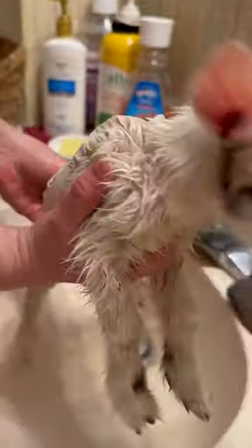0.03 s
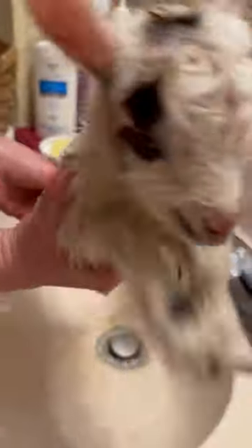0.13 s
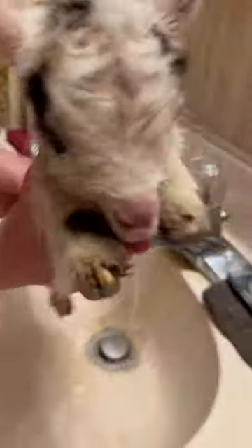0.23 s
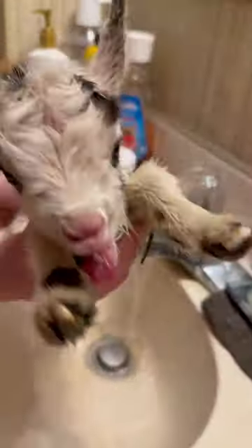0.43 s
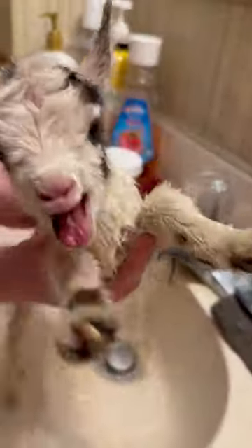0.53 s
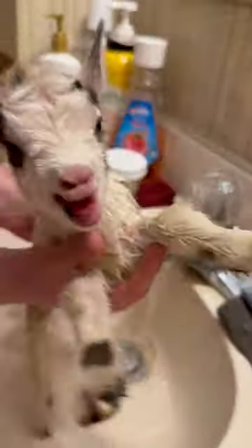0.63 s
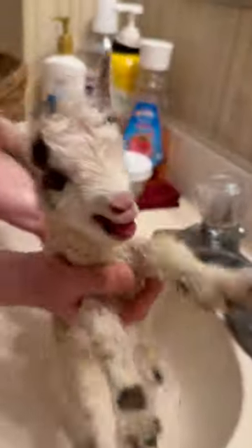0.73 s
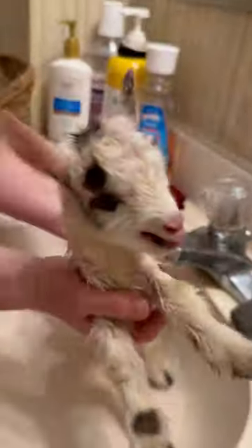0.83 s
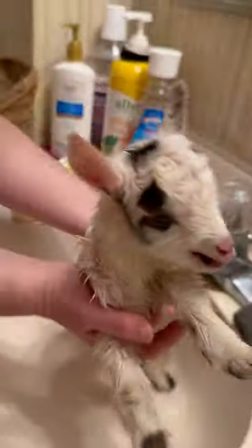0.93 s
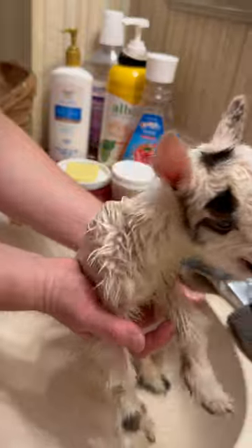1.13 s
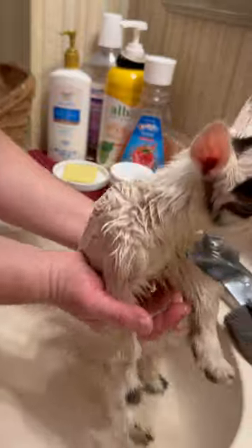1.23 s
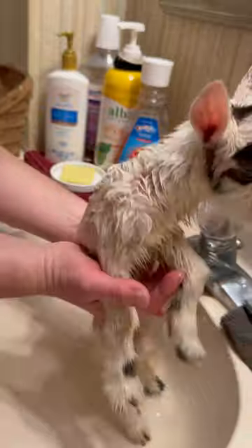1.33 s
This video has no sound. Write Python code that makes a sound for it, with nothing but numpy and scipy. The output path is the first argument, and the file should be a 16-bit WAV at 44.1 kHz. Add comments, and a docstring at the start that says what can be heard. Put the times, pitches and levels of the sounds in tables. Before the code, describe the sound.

A baby goat gives one loud, high bleat close to the microphone from about 0.1 to 0.55 seconds, starting as a thin squeak, opening into a clear shrill note and dropping into a rasp. A tap runs quietly into a bathroom sink throughout. Soft splashes come between 0.7 and 1.1 seconds, a brief low hum around 1.2, and light knocks on the basin near 1.3.

```python
"""A tap runs into a bathroom sink throughout, over a faint room rumble.
Almost at once a baby goat, held over the basin, gives one loud high bleat close to the microphone:
a thin closed-mouth squeak, a clear shrill note as the mouth opens, a rasp as the pitch drops.
Its vocal folds buzz through the throat; basin, wall and mirror reflect the cry.
A few soft splashes, a brief low hum and light knocks on the basin follow."""
import sys
import numpy as np
from scipy import signal
from scipy.fft import rfft, irfft
from scipy.io import wavfile
from scipy.ndimage import map_coordinates

SR = 44100
rng = np.random.default_rng(int(sys.argv[2]) if len(sys.argv) > 2 else 0)


def transcribe(u):
    """Save the signal u as a 16-bit wav file named by the first command-line argument.

    u: samples, shape (n,) or (channels, n), limited to [-1, 1]; the rate is SR.
    q: integer samples, one column per channel.
    """
    v = np.clip(np.atleast_2d(u).T, -1, 1)
    q = np.round(v * 32767).astype(np.int16)
    wavfile.write(sys.argv[1], SR, q)


N = 61739

# droplet spectrum: freq_hz, gain_db
WATER_SPECTRUM = [(150, -42), (250, -12.5), (480, -4.5), (700, -11.5), (1100, -12.5), (1630, -11.5),
                  (2050, -11), (2500, -4.5), (3200, -10), (4000, -5), (4500, -8.5), (6200, -7), (9500, -11),
                  (12400, -43)]
# basin resonances: freq_hz, width_hz, gain_db
BASIN_MODES = [(1628, 163, -6), (2502, 173, -4), (4022, 94, 2.5), (5120, 80, -4), (6130, 37, 0.5),
               (7180, 140, -11.5), (7760, 360, -13.5)]
# tap flow: time_s, gain_db
FLOW = [(0, 3), (.15, 2.5), (.6, 0.5), (.9, 0.5), (1.15, -1), (1.35, 1)]
# stereo width of the water: freq_hz, side_minus_mid_db
WATER_SIDE = [(60, -11), (110, -14), (200, -7), (380, -7), (700, 1.5), (1290, -15.5), (2380, 2), (4400, -7),
              (8120, 2.5), (15000, 23)]
# room rumble: freq_hz, gain_db
RUMBLE_SPECTRUM = [(20, -36), (40, -15), (54, 0.5), (80, -6.5), (140, -5), (220, -13.5), (500, -25),
                   (2000, -72)]
# bleat melody: time_s, pitch_hz
PITCH = [(.106, 1160), (.12, 869), (.145, 806), (.168, 963), (.2, 1030), (.236, 1087), (.275, 1080),
         (.335, 1047), (.37, 1047), (.42, 1024), (.445, 1030), (.5, 1012), (.517, 978.4), (.53, 870),
         (.54, 733.4), (.55, 642.4)]
# vocal effort: time_s, gain_db
EFFORT = [(0.1, -34), (0.12, -9.5), (0.15, -2), (0.175, -2), (0.195, -3), (0.218, 3.5), (0.245, -0.3),
          (0.27, 1.2), (0.295, 3), (0.32, 2), (0.375, 2.5), (0.45, -0.5), (0.512, -2.1), (0.524, -10.5),
          (0.533, -6), (0.547, -13), (0.56, -47)]
# hoarseness: time_s, roughness_0_to_1
ROUGHNESS = [(.11, 0.3), (.16, 0.31), (.18, 0.08), (.23, 0.05), (.3, 0.03), (.48, 0.04), (.512, 0.04),
             (.524, 0.51), (.55, 0.53)]
# air rush in the voice: freq_hz, gain_db
AIR_SPECTRUM = [(500, -26), (1400, -17), (2200, -9), (2750, 9.5), (3600, -16), (4500, 1), (5300, 8.5),
                (8000, -11), (11000, -6)]
# throat and open mouth: freq_hz, gain_db
THROAT_RESPONSE = [(300.0, -43), (800.0, -42.5), (1050.0, -34.5), (1400.0, -29), (1900.0, -21.5),
                   (2150.0, -23), (2700.0, -21), (3100.0, -24.5), (3300.0, -34.5), (3650.0, -36),
                   (4050.0, -35.0), (4250.0, -24), (4600.0, -33), (5000.0, -28.5), (5400.0, -23),
                   (5800.0, -27.5), (6200.0, -20), (6600.0, -30.5), (7300.0, -20), (8300.0, -26.5),
                   (8750.0, -31), (9400.0, -34), (10500.0, -41.5), (11200, -45), (12000, -104),
                   (13200, -48), (15000, -45)]
# basin, wall and mirror reflections: delay_ms, drift_ms_per_s, gain_db
ECHOES_LEFT = [(0.227, 0.28, -8.5), (1.565, 0.72, -18.5), (0.232, -0.71, -16)]
ECHOES_RIGHT = [(0.581, 0.86, -10), (2.463, -0.086, -13.5), (2.106, 0.677, -9.5)]
# splashes: start_s, pitch_hz, level_db, t60_s
SPLASHES = [(.717, 1580, -42.5, 0.044), (.782, 437, -51.5, 0.21), (0.852, 1550, -50.5, .05),
            (1.124, 1650, -42.5, 0.046)]
# hum swells: start_s, length_s, level_db
HUM_SWELLS = [(.99, 0.18, -56.5), (1.125, 0.14, -47.5)]
# knocks on the basin: start_s, level_db
KNOCKS = [(1.302, -47), (1.352, -46), (1.364, -48)]
# struck basin modes: freq_hz, gain_db, t60_s
KNOCK_MODES = [(567, -0.5, 0.073), (785, -4, .08), (1026, -8, 0.14), (1167, -1.5, .08), (1880, 0, 0.043)]

MOUTH_OPENS_S = 0.15
TIME_S = np.arange(N) / SR
SIDE_SIGNS = np.array([[1], [-1]])


def undb(db):
    """Decibels to gain."""
    return 10 ** (np.asarray(db) / 20)


def unit(x):
    """Scale to rms 1."""
    return x / np.sqrt(np.mean(x ** 2))


def curve(rows):
    """Join (time_s, value) points by straight lines."""
    return np.interp(TIME_S, *np.array(rows).T)


def colour(x, points):
    """Filter by a (freq_hz, gain_db) outline."""
    hz, db = np.array(points).T
    bins_hz = np.maximum(np.fft.rfftfreq(2 * N, 1 / SR), 1)
    gain = undb(np.interp(np.log(bins_hz), np.log(hz), db))
    return irfft(rfft(x, 2 * N) * gain)[..., :N]


def resonate(x, hz, width_hz):
    """One resonance, gain 1 at centre."""
    return signal.lfilter(*signal.iirpeak(hz, hz / width_hz, fs=SR), x)


def noise():
    """White noise."""
    return rng.standard_normal(N)


def band(hz, width_hz):
    """Steep noise band, rms 1."""
    return unit(resonate(resonate(noise(), hz, width_hz), hz, width_hz))


def wobble(hz):
    """Smooth random motion up to hz, rms 1."""
    return unit(signal.sosfilt(signal.butter(2, hz, fs=SR, output="sos"), noise()))


def fade(start_s, t60_s, attack_s=0.00096):
    """Quick rise, exponential decay."""
    age_s = np.maximum(TIME_S - start_s, 0)
    return (1 - np.exp(-age_s / attack_s)) * np.exp(-np.log(1000) * age_s / t60_s)


def droplets(rate_per_s=3500, spread_db=3.5):
    """Drop impacts: impulses of random time, sign and size."""
    hits = rng.random(N) < rate_per_s / SR
    return hits * np.sign(noise()) * undb(spread_db * noise())


def stream(patter_db=-53, ring_db=-52.5, drift_ratio=0.00697, waver_db=0.57, top_hz=9970):
    """Dense droplets patter on the basin and ring its wandering resonances."""
    patter = unit(colour(droplets(), [(60, -40)] + list(WATER_SPECTRUM)))
    ring = unit(sum(undb(db + 1.4 * wobble(18.5)) * resonate(droplets(), hz, width_hz)
                    for hz, width_hz, db in BASIN_MODES))
    warped_samples = np.cumsum(1 + drift_ratio * wobble(19.9))
    ring = map_coordinates(ring, [warped_samples], order=3, mode="mirror")
    flow = undb(curve(FLOW) + waver_db * wobble(12))
    water = (undb(patter_db) * patter + undb(ring_db) * ring) * flow
    return signal.sosfilt(signal.cheby1(10, .5, top_hz, fs=SR, output="sos"), water)


def tap():
    """Running water, spread left and right."""
    return stream() + colour(stream(), WATER_SIDE) * SIDE_SIGNS


def rumble(level_db=-65):
    """Low room noise, mostly centred."""
    mid = unit(colour(noise(), RUMBLE_SPECTRUM))
    side = unit(colour(noise(), RUMBLE_SPECTRUM))
    return undb(level_db) * (mid + 0.3 * side * SIDE_SIGNS)


def mouth_gain(harmonic, opening_s=.011, nasal_db=5.5, closed_db_per_octave=-29.5):
    """Until it opens, the mouth muffles overtones and favours the fundamental."""
    closed = np.exp(-np.maximum(TIME_S - MOUTH_OPENS_S, 0) / opening_s)
    return undb(closed * (nasal_db + closed_db_per_octave * np.log2(harmonic)))


def notch_gain(hz, centre_hz=4100, width_hz=160, depth_db=-9, end_s=0.2086):
    """Overtone dip; vanishes as the cry reaches full voice."""
    early = np.clip((end_s - TIME_S) / .004, 0, 1)
    return undb(depth_db * early * np.exp(-((hz - centre_hz) / width_hz) ** 2))


def bleat(harmonics=15, flutter_hz=258, jitter_per_rough=.042, shimmer_per_rough=0.59, air_gain_db=-5.5):
    """Vocal folds flutter with hoarseness; their harmonics and pulsed air pass through the throat."""
    rough, pitch_hz = curve(ROUGHNESS), curve(PITCH)
    flutter = unit(resonate(noise(), flutter_hz, width_hz=320))
    pitch_ratio = 1 + jitter_per_rough * rough * flutter + 0.0013 * wobble(43)
    phase = 2 * np.pi * np.cumsum(pitch_hz * pitch_ratio) / SR
    folds = sum(mouth_gain(k) * notch_gain(k * pitch_hz) * np.sin(k * phase)
                for k in range(1, harmonics + 1))
    air_gain = undb(air_gain_db) * np.sqrt(harmonics) * rough * mouth_gain(harmonics / 2)
    air = air_gain * (1 + np.cos(phase)) * colour(noise(), AIR_SPECTRUM)
    source = folds * (1 + shimmer_per_rough * rough * wobble(350)) + air
    voiced = (TIME_S > EFFORT[0][0]) & (TIME_S < EFFORT[-1][0])
    return colour(source * undb(curve(EFFORT)) * voiced, THROAT_RESPONSE)


def mic_port(x, echoes, lag_s=0, reference_s=0.3526):
    """Direct sound plus reflections at one port; their delays drift as the head moves."""
    def delayed(delay_s):
        return map_coordinates(x, [(TIME_S - delay_s) * SR], order=3)

    reflections = sum(undb(db) * delayed((delay_ms + drift_ms_per_s * (TIME_S - reference_s)) / 1000)
                      for delay_ms, drift_ms_per_s, db in echoes)
    return delayed(lag_s) + reflections


def room(x, t60_s=0.16, gain_db=-11):
    """Short diffuse ring of a small bathroom."""
    tails = rng.standard_normal((2, N)) * fade(0.0046, t60_s)
    tails /= np.sqrt(np.sum(tails ** 2, axis=1, keepdims=True))
    return undb(gain_db) * signal.fftconvolve(x[None], tails, axes=1)[:, :N]


def lips(level_db=-40):
    """Faint wet smack as the lips part."""
    return undb(level_db) * band(hz=1250, width_hz=400) * fade(MOUTH_OPENS_S, t60_s=0.045)


def splashes():
    """Small dollops of water land in the basin."""
    return sum(undb(db) * band(hz, hz / 3) * fade(start_s, t60_s) for start_s, hz, db, t60_s in SPLASHES)


def hum(pitch_hz=138.1):
    """Low hum, two swells, perhaps from the drain."""
    swells = sum(undb(db) * np.sin(np.pi * np.clip((TIME_S - start_s) / length_s, 0, 1))
                 for start_s, length_s, db in HUM_SWELLS)
    wavering_hz = pitch_hz * (1 + 0.023 * wobble(13))
    return swells * np.sin(2 * np.pi * np.cumsum(wavering_hz) / SR)


def knocks(scatter_db=2, thud_db=-7.5):
    """Light bumps on the basin: a dull thud and short modes, struck differently each time."""
    out = 0
    for start_s, level_db in KNOCKS:
        ring = 0
        for hz, mode_db, t60_s in KNOCK_MODES:
            gain = undb(mode_db + scatter_db * rng.standard_normal())
            ring += gain * fade(start_s, t60_s) * np.sin(2 * np.pi * hz * (TIME_S - start_s))
        thud = undb(thud_db) * band(hz=820, width_hz=820) * fade(start_s, t60_s=0.057)
        out += undb(level_db) * (ring + thud)
    return out


def scene():
    """Goat close by, water and small sounds around it; stereo."""
    voice = bleat() + lips()
    goat = np.array([mic_port(voice, ECHOES_LEFT, lag_s=2.9e-5), mic_port(voice, ECHOES_RIGHT)])
    impacts = splashes() + knocks()
    return rumble() + goat + room(voice + impacts) + impacts + tap() + hum()


def record(dry, top_hz=15800):
    """Steep treble cut."""
    return signal.sosfilt(signal.ellip(10, .2, 80, top_hz, fs=SR, output="sos"), dry)


dry = scene()
out = record(dry)
transcribe(out)
```